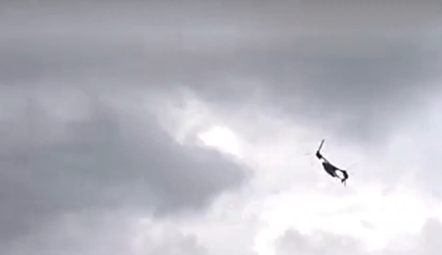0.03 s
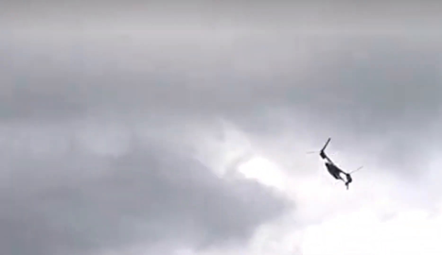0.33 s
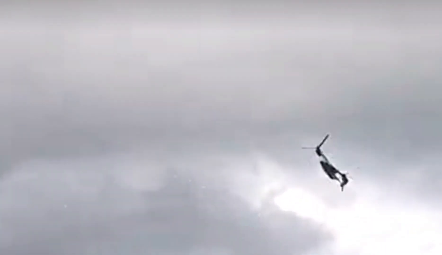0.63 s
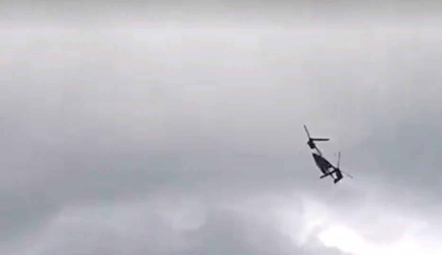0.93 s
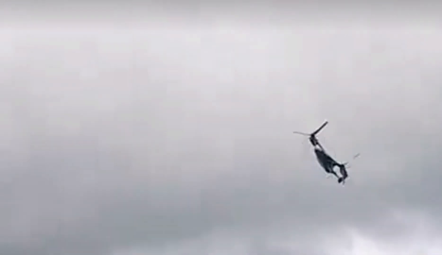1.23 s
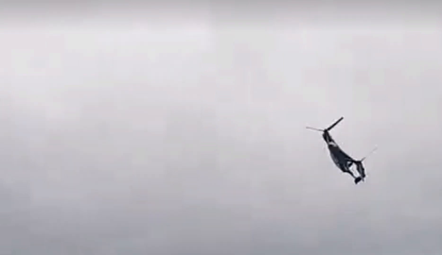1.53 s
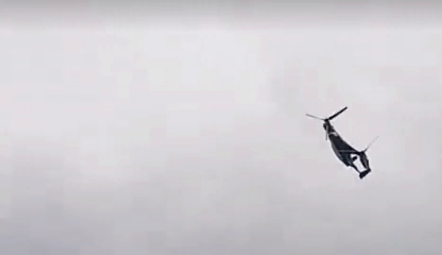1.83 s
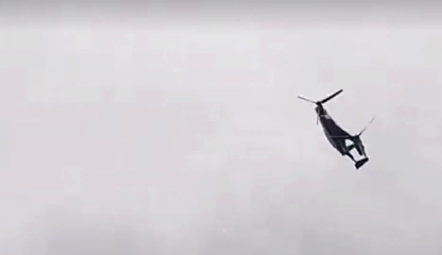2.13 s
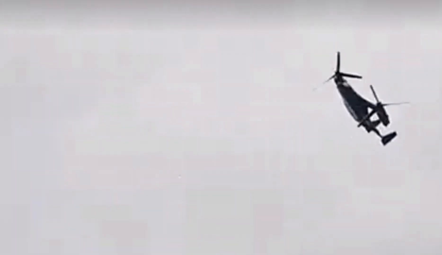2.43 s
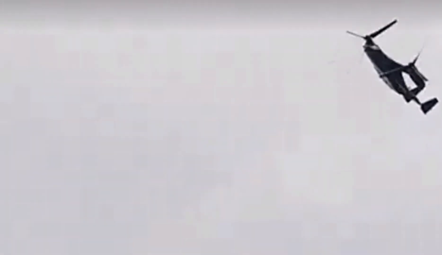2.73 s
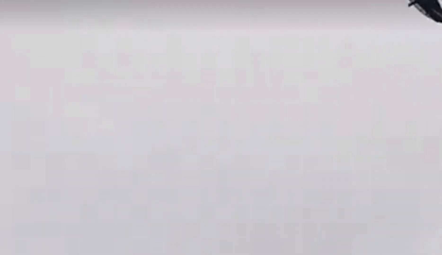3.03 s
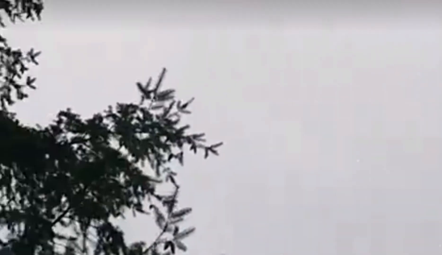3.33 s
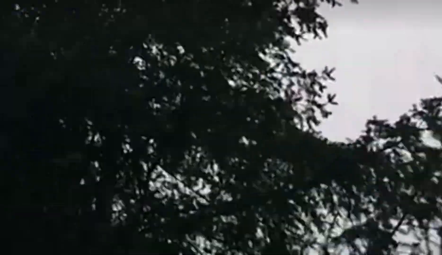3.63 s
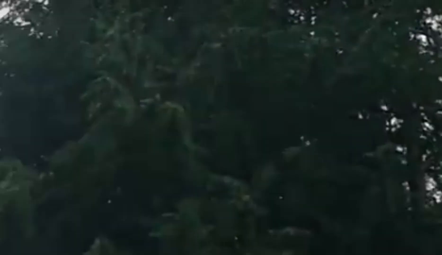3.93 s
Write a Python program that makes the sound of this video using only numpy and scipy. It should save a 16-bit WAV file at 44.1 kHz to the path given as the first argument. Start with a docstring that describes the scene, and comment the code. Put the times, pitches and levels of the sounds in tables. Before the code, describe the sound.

The rushing roar of a rotor aircraft flying closer, with a faint low throb.

```python
"""A tiltrotor aircraft flies in.

Its blades tear the air into a broad roar whose bright swish surges about once per rotor turn, with
short rasps, a turbine whine and then a low throb. As it nears, the air dulls it less and the echo
off the ground arrives ever later, so a hollow colour sweeps down through the roar.
A faint high hiss comes and goes early on."""
import sys
import numpy as np
from scipy import signal
from scipy.fft import rfft, irfft
from scipy.io import wavfile
from scipy.ndimage import uniform_filter1d, minimum_filter1d, map_coordinates

SR = 44100
rng = np.random.default_rng(int(sys.argv[2]) if len(sys.argv) > 2 else 0)


def store_wav(level_fs):
    """Save 16-bit WAV to argv[1]."""
    pcm = np.round(np.clip(np.atleast_2d(level_fs), -1, 1) * 32767)
    wavfile.write(sys.argv[1], SR, pcm.T.astype(np.int16))


N = 176400
TIME = np.arange(N) / SR


def from_db(db):
    """Turn decibels into a number to multiply by."""
    return 10 ** (np.asarray(db) / 20)


def in_time(rows, s, column=1):
    """Read one column of a table at times s, in seconds."""
    rows = np.array(rows)
    return np.interp(s, rows[:, 0], rows[:, column])


def at_hz(rows, hz, column=1):
    """Read one column of a table at frequencies hz, with octaves evenly spaced."""
    rows = np.array(rows)
    return np.interp(np.log(hz + 1), np.log(rows[:, 0]), rows[:, column])


def filtered(x, response):
    """Multiply each frequency in x by response(hz)."""
    return irfft(rfft(x) * response(np.arange(N // 2 + 1) * SR / N), N)


def white(channels):
    """Noise equally strong at all frequencies, 0 dB per Hz."""
    return rng.standard_normal((channels, N)) * np.sqrt(SR / 2)


def drift(rate_hz, s):
    """A smooth random wobble of typical size 1, read at times s."""
    wobble = filtered(rng.standard_normal(N), lambda hz: 1 / (1 + (hz / rate_hz) ** 2))
    return np.interp(s, TIME, wobble / wobble.std())


# The tone of the hiss: (frequency [Hz], level added to level_db [dB])
HISS = [(7400, -33), (8200, 8.5), (13000, -2), (14000, -10)]

def high_hiss(start_s=0.41, end_s=0.72, fade_db_per_s=99, level_db=-89):
    """A faint high hiss fades in, holds from start_s to end_s and fades out."""
    outside_s = np.maximum(np.maximum(start_s - TIME, TIME - end_s), 0)
    swell = from_db(-fade_db_per_s * outside_s)
    return swell * filtered(white(channels=2), lambda hz: from_db(level_db + at_hz(HISS, hz)))


# The low throb of the blades: (time [s], pitch [Hz], level [dB])
THROB = [(1.08, 335, -42), (1.55, 298, -30.5), (2.0, 279, -32), (2.8, 253, -37)]
BLADES_HZ = 24.37   # blade passes heard each second

def blade_throb(half_length_s=.0095, uneven_db=1.2, wander_radians=.75):
    """Each passing blade gives one low thump; the pitch sinks as the aircraft nears."""
    beats = np.arange(THROB[0][0], THROB[-1][0], 1 / BLADES_HZ)
    out = np.zeros(N)
    for at, (strength, phase) in zip(beats, rng.standard_normal((len(beats), 2))):
        near = np.abs(TIME - at) < 1 / BLADES_HZ
        since = TIME[near] - at
        size = 2 * from_db(in_time(THROB, at, column=2) + uneven_db * strength)
        tone = np.cos(2 * np.pi * in_time(THROB, at) * since + wander_radians * phase)
        out[near] += size * np.exp(-(since / half_length_s) ** 2) * tone
    return out


def shimmer_db(hz, s, depth_db=1.8, width_hz=60, length_s=.014):
    """Churning air briefly strengthens and weakens narrow bands of the roar."""
    patches = rng.standard_normal((len(hz), len(s)))
    for axis, step in enumerate((hz[1] / width_hz, s[1] / length_s)):
        blur = np.exp(-.5 * (np.arange(-20, 21) * step) ** 2)
        patches = signal.fftconvolve(patches, np.expand_dims(blur, 1 - axis), mode="same")
    return depth_db * patches / patches.std()


# A hollow-sounding peak that glides up: (time [s], pitch [Hz], boost [dB])
HOLLOW = [(.45, 1930, 3), (.95, 2040, 6), (1.22, 2300, 3), (1.6, 2640, -0.5), (3.5, 2530, 3)]
# The whine of the turbines: (time [s], pitch [Hz], boost [dB])
WHINE = [(.45, 1433, 1), (.88, 1297, 4), (1.12, 1440, 3), (1.3, 1470, 0.5)]

def whine_and_hollow_db(hz, s):
    """The turbine whine and a hollow peak each rise out of the roar between two shallow dips."""
    boost = 0
    for glide, width_hz in ((HOLLOW, 190), (WHINE, 138)):
        away = ((hz[:, None] - in_time(glide, s)) / width_hz) ** 2
        boost += in_time(glide, s, column=2) * (1 - away) * np.exp(-away / 2)
    return boost


# Short rasps of the blades: (time [s], pitch [Hz], boost [dB])
RASPS = [(.607, 3950, 12), (.735, 3850, 9), (1.177, 5000, 7), (1.215, 3800, 6), (1.35, 4000, 8),
         (1.595, 4700, 9), (1.846, 4900, 7), (1.969, 4850, 11), (2.87, 4700, 9)]

def blade_rasps_db(hz, s, width_hz=600, length_s=.017, rise_hz_per_s=15000):
    """Each rasp lifts a narrow, high band of the roar that slides upward for a moment."""
    boost = 0
    for at, pitch, db in RASPS:
        away_hz = hz[:, None] - pitch - rise_hz_per_s * (s - at)
        boost += db * np.exp(-((s - at) / length_s) ** 2 - (away_hz / width_hz) ** 2)
    return boost


def air_loss_db(hz, s, speed_m_per_s=96, overhead_s=5, height_m=63, db_per_m=0.0522):
    """Air soaks up the highest sounds, less so as the aircraft gets closer."""
    distance_m = np.hypot(height_m, speed_m_per_s * (s - overhead_s))
    absorbed = np.interp(hz, [4400, 8200], [0, 1])
    return db_per_m * np.outer(absorbed, distance_m)


# How four bands of the roar swell, from low to high. Each: (time [s], relative level [dB])
RUMBLE = [(0.0, 3.5), (0.52, 4), (1.16, -3), (1.62, -6.3), (4.0, -4.5)]
BODY = [(0.0, 0.5), (0.3, 4.5), (1.0, 1.5), (1.32, -2), (2.7, -1.5), (3.3, -6), (4.0, -3)]
RUSH = [(0.0, 3), (0.25, 3.5), (0.56, 4.5), (0.82, 0.5), (0.92, 4.5), (1.22, 1.5), (1.3, -1.5),
        (1.42, -4.5), (1.5, -1.2), (1.7, -2), (1.84, 3.5), (1.98, -1.5), (2.3, -0.5), (2.42, 3.5),
        (2.58, -2.5), (2.76, 0.5), (3.14, -1.7), (3.28, -0.9), (4.0, -4)]
SWISH = [(0.0, -4), (0.34, -6), (0.48, -2), (0.56, -4), (0.8, -5), (0.86, 2.5), (0.9, -3.5), (0.95, 3.2),
         (1.22, 1), (1.28, -6), (1.35, -2), (1.42, -8), (1.47, -2), (1.78, -2), (1.98, 4), (2.16, -0.5),
         (2.32, 1), (2.46, 5.5), (2.55, 0.5), (2.76, 4), (2.93, 0), (3.0, 3), (3.2, -0.5), (3.27, 4),
         (3.54, 5), (3.63, -1), (3.76, -3), (3.83, 3), (3.89, -8.5), (3.97, 1.5)]
# The middle of each of those bands: (frequency [Hz])
BAND_HZ = [230, 600, 1700, 3900]
FRAME, HOP = 512, 128   # length and spacing of the slices the roar is shaped in, in samples

def swells_db(hz, s, top_hz=5640, top_smooth_s=0.18, turbulence_db=0.63, turbulence_hz=9.2):
    """Each band swells on its own and wavers with turbulence; a top band slowly follows the swish."""
    rumble, body, rush, swish = [in_time(curve, s) for curve in (RUMBLE, BODY, RUSH, SWISH)]
    top = uniform_filter1d(swish, int(top_smooth_s * SR / HOP) + 1)
    levels = [band + turbulence_db * drift(turbulence_hz, s) for band in (rumble, body, rush, swish, top)]
    centres = np.log([*BAND_HZ, top_hz])
    blend = np.array([np.interp(np.log(hz + 1), centres, band) for band in np.eye(len(levels))])
    return blend.T @ np.array(levels)


def rotor_roar(level_db=0.07, flutter_depth=0.045, rough_db=0.65, rough_hz=59):
    """Blades tear the air: two separate noises swell alike and flutter with each passing blade."""
    hz, s, noise = signal.stft(white(channels=2), SR, nperseg=FRAME, noverlap=FRAME - HOP)
    shape_db = swells_db(hz, s) + whine_and_hollow_db(hz, s) + shimmer_db(hz, s) + blade_rasps_db(hz, s)
    gain = from_db(shape_db - air_loss_db(hz, s))
    gain /= np.sqrt(np.mean(gain ** 2, axis=1, keepdims=True))   # same average power at every frequency
    roar = signal.istft(noise * gain, SR, nperseg=FRAME, noverlap=FRAME - HOP)[1][:, :N]
    flutter = 1 + flutter_depth * np.sin(2 * np.pi * (BLADES_HZ * TIME + rng.random()))
    return from_db(level_db + rough_db * drift(rough_hz, TIME)) * flutter * roar


# How late the ground echo is as the aircraft climbs in the sky: (time [s], delay [ms])
ECHO_DELAY = [(.7, 1.46), (1.1, 2.63), (1.8, 3.31), (2.45, 3.98), (3.3, 6.1), (4, 9.05)]
# How much sound the ground bounces back: (frequency [Hz], share [0-1])
GROUND_BOUNCE = [(200, 0.32), (500, 0.36), (1100, 0.16), (4000, 0.025)]

def over_ground(x, lag_radians=0.25):
    """Add a duller, ever later echo off soft ground, which itself holds the wave back a little."""
    share = lambda hz: at_hz(GROUND_BOUNCE, hz)
    bounced = filtered(x, lambda hz: share(hz) * np.exp(-1j * lag_radians))
    read_at = (TIME - in_time(ECHO_DELAY, TIME) / 1000) * SR
    echo = np.array([map_coordinates(side, [read_at], order=3, mode="wrap") for side in bounced])
    return filtered(x + echo, lambda hz: 1 / np.sqrt(1 + share(hz) ** 2))   # keep the average power


# The roar's average tone: (frequency [Hz], left level [dB per Hz], right level [dB per Hz])
ROAR_TONE = [(80.4, -82, -87), (125, -64, -63.5), (185, -59.5, -59), (303, -49.5, -52.5),
             (404, -57.5, -54.5), (606, -59, -53), (708, -65, -63), (900, -52.5, -57), (1054, -50.5, -56),
             (1374, -46.5, -44.5), (1630, -46, -53), (1963, -47, -41), (2213, -47, -55.5),
             (2630, -50.0, -48.5), (2876, -55, -52.5), (3700, -58, -45.5), (4120, -54, -48.5),
             (4490, -57.5, -66), (4730, -57.5, -52.5), (5390, -66, -57.5), (6275, -65.5, -60.5),
             (7820, -83.5, -82.5), (8330, -74.5, -74), (10210, -102.5, -99), (12300, -110, -110)]
# How far the left wave runs ahead of the right: (frequency [Hz], phase [radians])
LEFT_LEAD = [(250, 0), (450, -.55), (730, .4), (1000, -.2), (1170, -1.8), (1400, -1.1), (1950, -2.9),
             (2400, -.2), (3000, 3), (3900, 6.1), (4400, 3), (4950, 2.6), (5300, -.7)]
# How alike the two sides sound: (frequency [Hz], likeness [0-1])
LIKENESS = [(150, 0.96), (550, 0.89), (900, 0.61), (1500, 0.87), (2300, 0.53), (9000, 0)]

def at_microphone(x):
    """The microphone's two openings share part of the roar, each with its own tone and timing."""
    common = filtered(x[0], lambda hz: np.sqrt((1 + at_hz(LIKENESS, hz)) / 2))
    apart = filtered(x[1], lambda hz: np.sqrt((1 - at_hz(LIKENESS, hz)) / 2))
    lag = lambda hz: np.exp(-1j * at_hz(LEFT_LEAD, hz))
    left = filtered(common + apart, lambda hz: from_db(at_hz(ROAR_TONE, hz, column=1)))
    right = filtered(common - apart, lambda hz: from_db(at_hz(ROAR_TONE, hz, column=2)) * lag(hz))
    return np.array([left, right])


def scene(floor_db=-114):
    """The aircraft's roar over open ground, its throb, the brief hiss and very quiet steady noise."""
    roar = at_microphone(over_ground(rotor_roar()))
    return roar + blade_throb() + high_hiss() + from_db(floor_db) * white(channels=2)


def record(dry, ceiling=.95, smooth_s=.004, cutoff_hz=15000):
    """A limiter gently turns down any peak above the ceiling; the very highest sounds are cut."""
    size = int(smooth_s * SR)
    peaks = np.maximum(np.abs(dry).max(axis=0), ceiling)
    gain = minimum_filter1d(ceiling / peaks, 2 * size + 1)
    gain = uniform_filter1d(uniform_filter1d(gain, size), size)
    return signal.sosfilt(signal.cheby2(14, 60, cutoff_hz, fs=SR, output="sos"), dry * gain)


dry = scene()
out = record(dry)
store_wav(out)
```